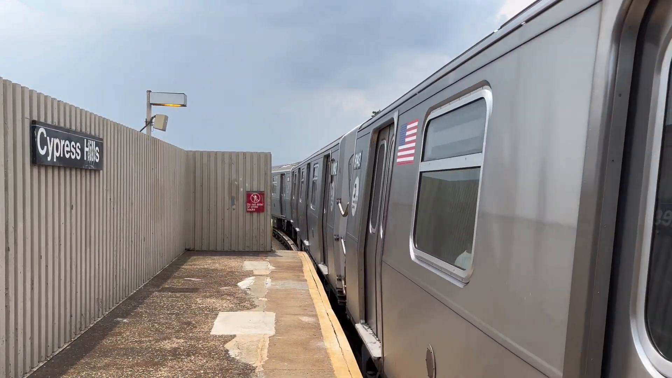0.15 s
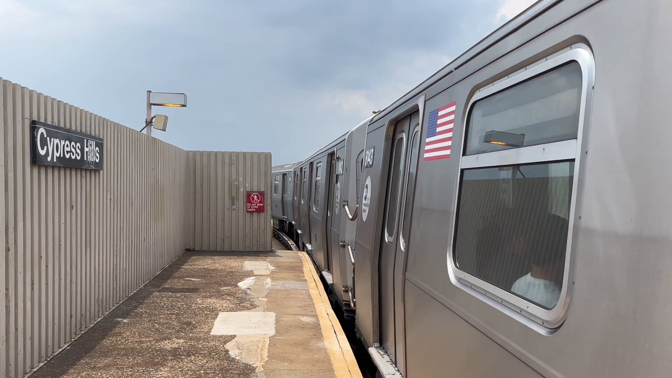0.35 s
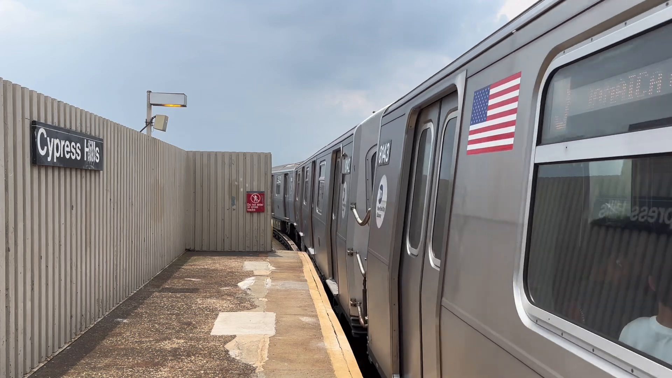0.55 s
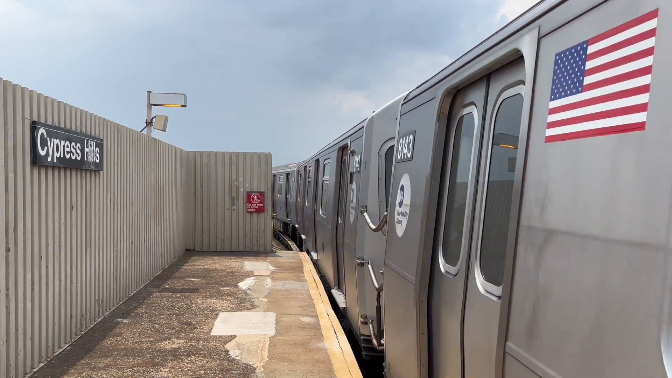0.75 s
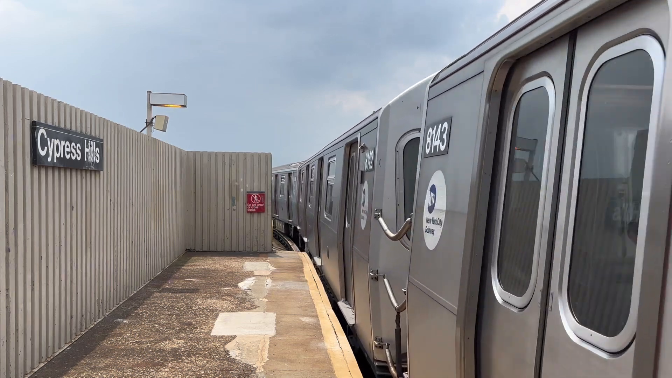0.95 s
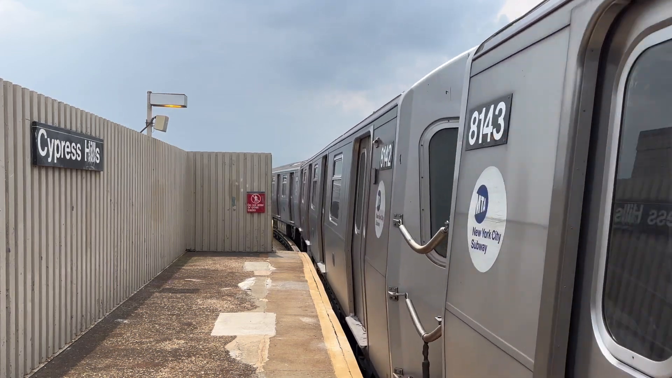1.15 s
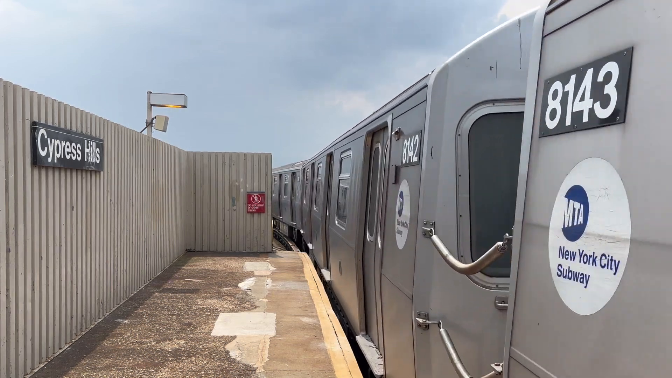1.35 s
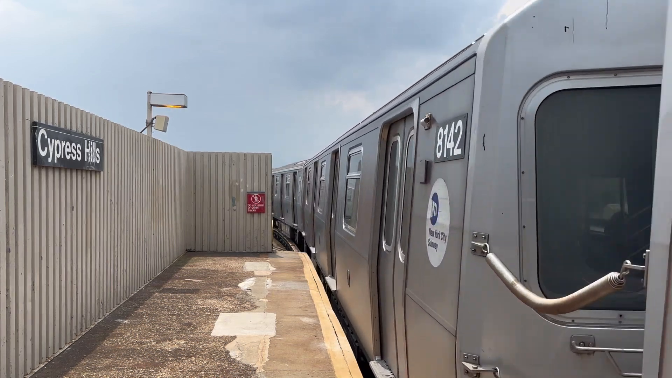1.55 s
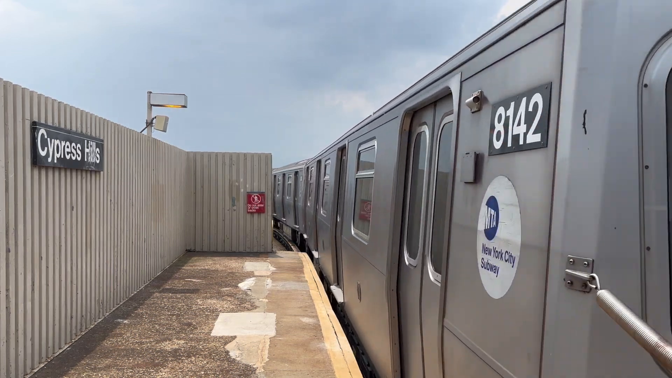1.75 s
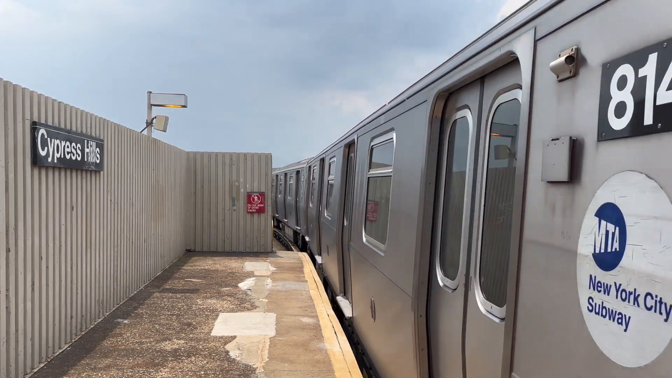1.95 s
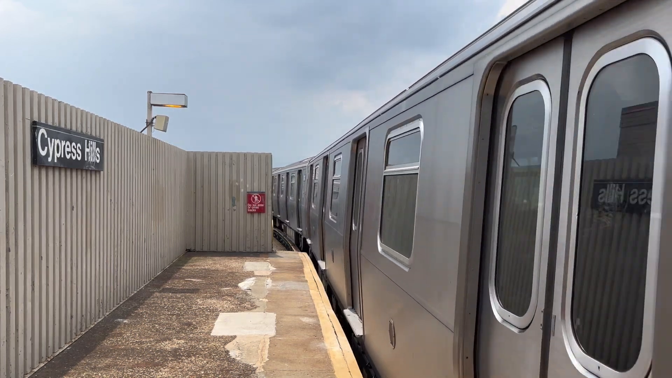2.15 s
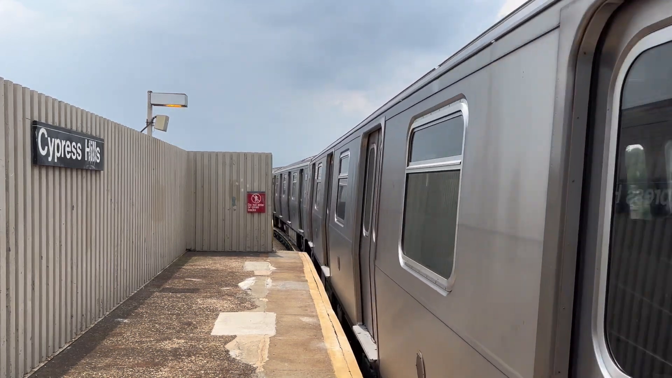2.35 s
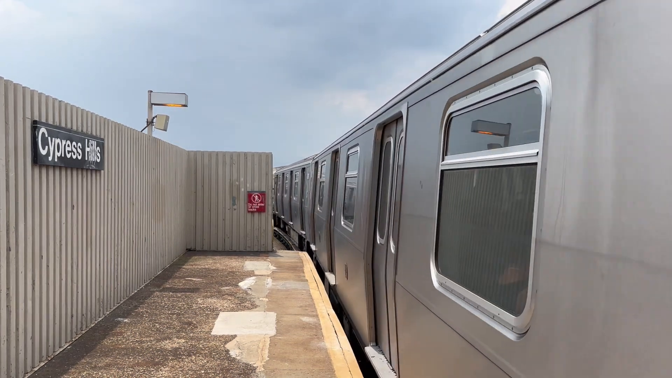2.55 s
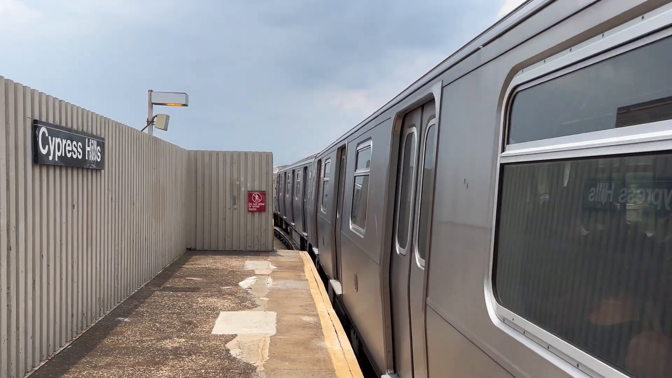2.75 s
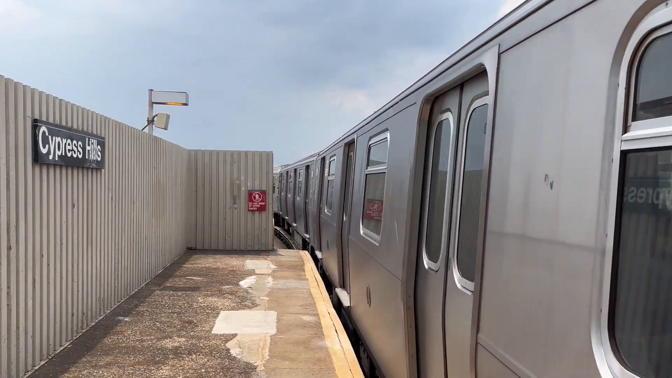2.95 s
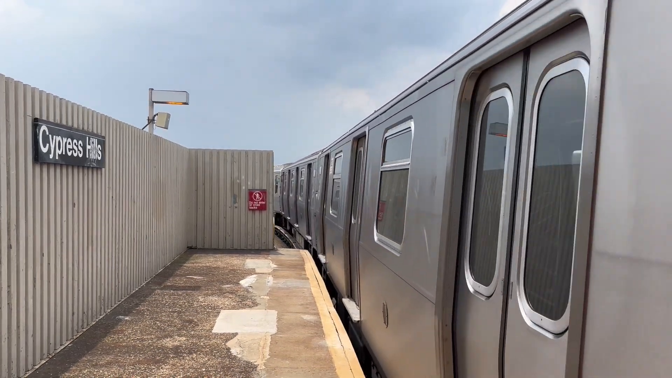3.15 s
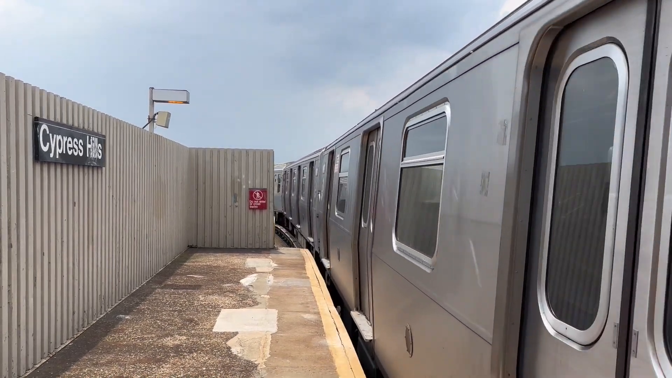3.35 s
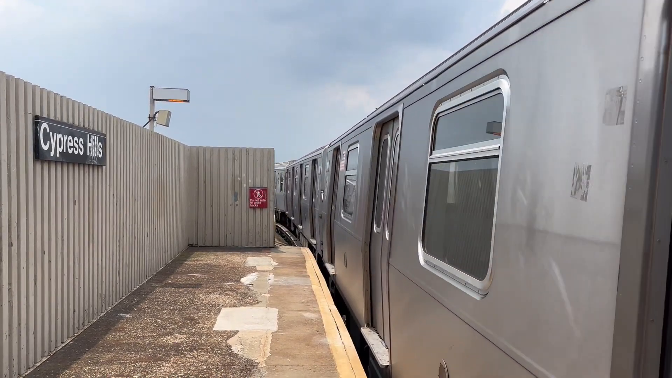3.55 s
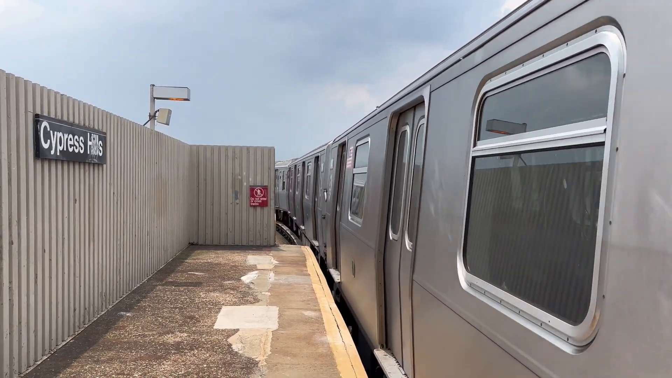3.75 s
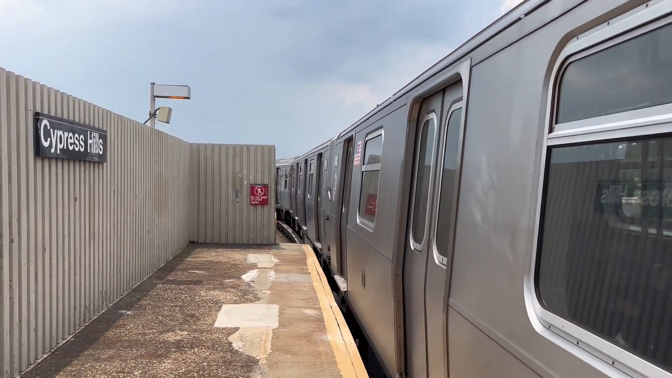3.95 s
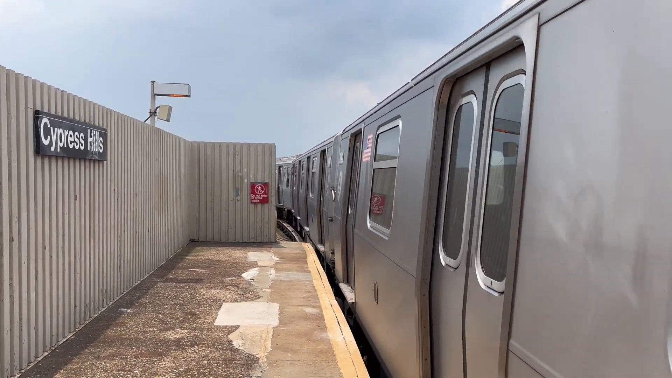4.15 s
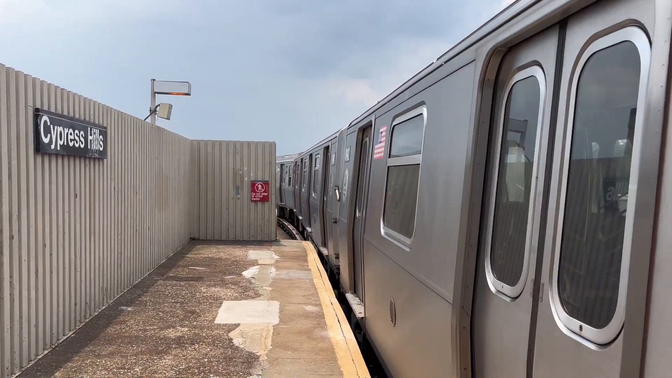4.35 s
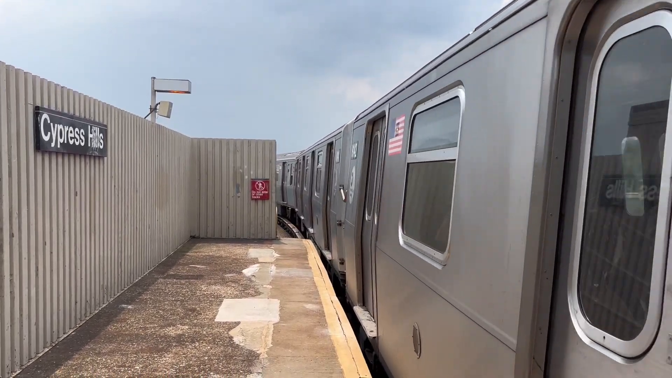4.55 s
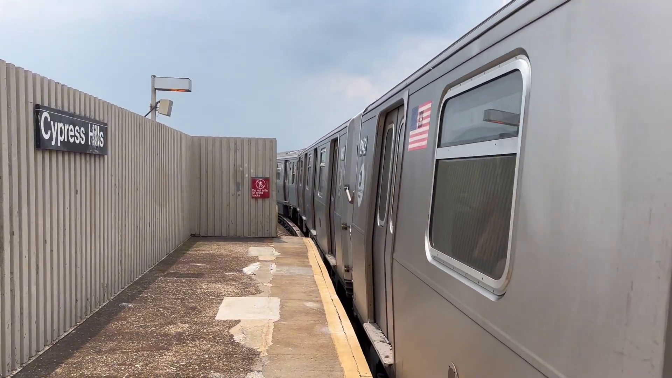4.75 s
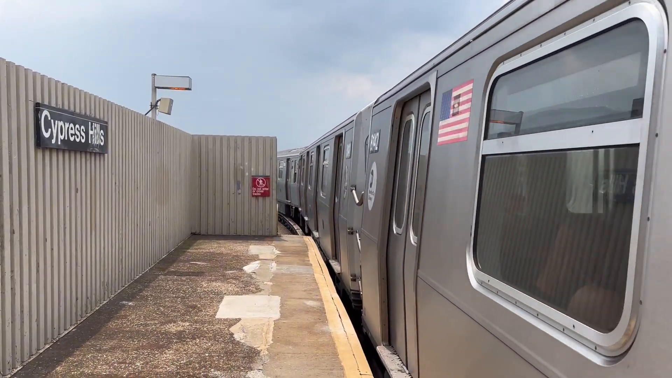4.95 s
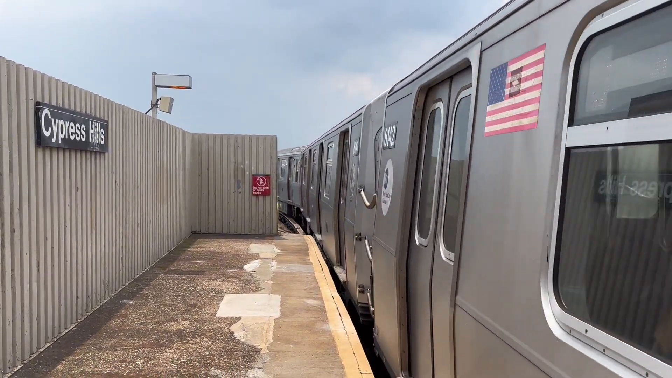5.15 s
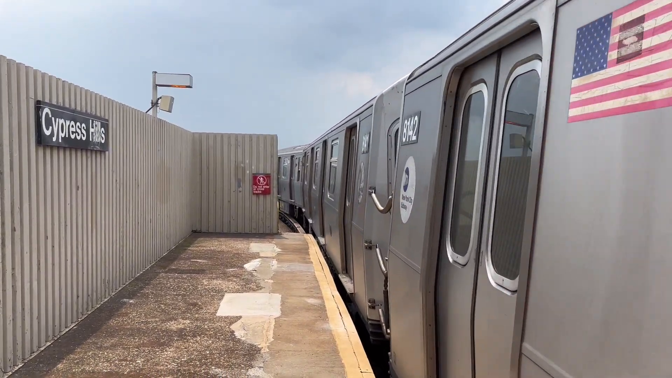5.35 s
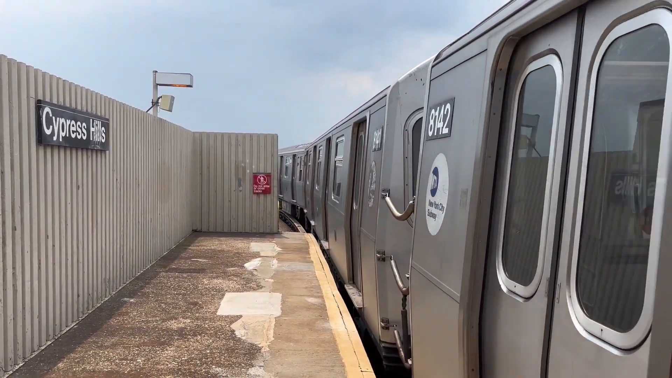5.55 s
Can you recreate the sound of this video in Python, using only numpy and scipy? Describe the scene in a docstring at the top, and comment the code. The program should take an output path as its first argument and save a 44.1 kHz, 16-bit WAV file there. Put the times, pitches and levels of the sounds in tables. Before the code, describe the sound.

Close heavy train wheels rumble and knock over rail joints, with a short opening squeal and later a thin, high, rough squealing.

```python
"""On the platform of an elevated steel track, a metre or two from a phone, a steel train rolls slowly round a curve.
Girders, track and wheels rumble, drone and grind as bands of shaped noise that follow the rolling.
Wheels knock over rail joints: bursts in the same bands, plus decaying sine modes of the struck steel.
Slipping wheels squeal and squeak as wavering tones or rough bands, with a broad rough hiss around two squeals."""
import sys
import numpy as np
from scipy import signal
from scipy.fft import rfft, irfft, next_fast_len
from scipy.io import wavfile
from scipy.ndimage import uniform_filter1d

SR = 44100
rng = np.random.default_rng(int(sys.argv[2]) if len(sys.argv) > 2 else 0)


def voltage_ratio(decibels):
    """Convert decibels (scalar or array-like) to amplitude ratios, 20 dB per decade."""
    exponent = np.asarray(decibels, float) / 20
    return 10 ** exponent


def unload_wav(signal):
    """Save mono or channel-first audio to the path in sys.argv[1] as 16-bit WAV at rate SR, clipped to [-1, 1]."""
    wavfile.write(
        sys.argv[1],
        SR,
        np.round(np.clip(np.atleast_2d(signal).T, -1, 1) * 32767).astype(np.int16),
    )


N = 247401
M = next_fast_len(N)  # spectrum length in samples
F = np.maximum(np.arange(M // 2 + 1) * SR / M, 1)  # Hz
T = np.arange(N) / SR  # seconds

# Steady rolling. Each row: time in seconds, girder boom in dB, track drone in dB, wheel grind in dB.
ROLL = [(0.0, -18.5, -23.5, -34.5), (0.28, -22.5, -25.5, -30), (0.45, -21, -20, -33),
        (1.12, -26, -22.5, -37), (1.45, -20, -23.5, -29), (1.67, -23, -20, -37.5), (1.94, -21, -24, -32.5),
        (2.25, -24, -18.5, -35), (2.53, -21.5, -24.5, -37.5), (2.83, -33, -25, -39.5),
        (3.23, -28, -21, -34), (3.47, -20.5, -24.5, -38.5), (4.05, -25.5, -27, -38.5),
        (4.34, -24.5, -22, -37.5), (4.73, -24, -28, -40), (4.86, -18, -21, -37), (5.0, -25.5, -22, -36.5),
        (5.61, -19.5, -26, -37.5)]
# Bands of boom, drone, grind and hiss. Each row: low edge in Hz, high edge in Hz.
ROLL_BANDS = [(30, 100), (120, 500), (800, 3500), (11000, 14000)]
# Colour of rolling. Each row: frequency in Hz, relative density in dB per Hz.
ROLL_COLOUR = [(22, -3), (35, -14), (52, 3), (90, 4), (125, -9), (210, -10), (500, -20.5), (800, -27),
               (1900, -36), (2600, -39.5), (5000, -47.5), (8500, -46.5), (12000, -51), (15500, -53.5)]
# Peaks and dips in the colour of rolling. Each row: frequency in Hz, width in Hz, gain in dB.
COLOUR_PEAKS = [(52.7, 12, 11.5), (135.7, 33, 7), (217.4, 39, 4), (368, 22, 0), (464, 20, 4.5),
                (1290, 76, 1), (1680, 17, -9), (2035, 36, 3), (2540, 48, -6), (3010, 140, 4),
                (4300, 1700, 5.5), (6550, 49, 5), (8450, 290, 0)]
# Wheels over joints; far joints arrive smeared.
# Each row: time in seconds, clack in dB, thud over clack in dB, tick over clack in dB, softness in ms.
KNOCKS = [(.204, -17, 5, -19.5, 1.9), (.289, -20.5, 0, -22, 16), (.682, -12, -4.5, -23, 4.8),
          (.728, -36.5, 20, -20, 5.5), (.902, -23.5, 2.5, -29.5, 4.2), (1.097, -27, 9, -21, 6.3),
          (1.332, -18, 3, -20, 1.5), (1.407, -24.5, 12.5, -21.5, 6), (1.698, -19.5, -3, -16, 0.74),
          (1.822, -13.5, -2.5, -24.5, 1.6), (1.903, -19.5, 6.5, -30, 3.7), (1.963, -20, -7, -40, 7.1),
          (2.475, -20.5, -1, -23, 8.1), (2.574, -24, 8.5, -18, 2), (2.717, -37, 13.5, -34, 4.6),
          (2.991, -18.5, 2.5, -26, 64), (3.088, -22, 3, -35, 1.6), (3.167, -26.5, 5, -22, 6.1),
          (3.493, -28, 4, -12.5, 20), (3.563, -19, -3, -31.5, 42), (3.659, -15.5, -5, -23, 75),
          (4.224, -28.5, 11.5, -34, 6.4), (4.285, -25, -4, -26, 8.4), (4.689, -18.5, 6, -18, 4.8),
          (4.807, -23.5, -1, -40, 5.1), (5.23, -14, -6, -25, 1.4), (5.27, -38.5, 19.5, -8, 7.5)]
# Where the parts of a knock sit: thud, body, clack and tick in Hz.
KNOCK_PART_HZ = [180, 500, 1800, 7000]
# How a knock rings out; lows stay longest.
# Each row: frequency in Hz, 60 dB decay in seconds, rise in seconds, colour in dB.
KNOCK_RING = [(40, 0.98, 0.015, -15), (81, 0.52, 0.034, -8.5), (162, 0.51, 0.0027, -5),
              (403, 0.57, 0.0083, -5.5), (960, 0.56, 0.011, -14.5), (1490, 0.39, 0.0092, -14),
              (2030, 0.32, 0.0038, -15.5), (2630, 0.39, 0.0051, -19.5), (3940, 0.55, 0.0018, -14),
              (9000, 0.47, 0.00068, -10), (14400, 0.45, .001, -20)]
# What wheel and rail ring with when struck.
# Each row: frequency in Hz, relative level in dB, 60 dB decay in seconds.
BLOW_MODES = [(330, -7, .12), (420, -7, .12), (530, -7, .12), (620, -7, .12), (720, -8, .11),
              (930, -12, .1), (1120, -13, .09), (1290, -13, .09), (1420, -13, .09), (1560, -14, .08),
              (1760, -15, .08), (1960, -16, .08), (2200, -18, .07)]
# How hard each squeal sounds, one list a squeal. Each row: time in seconds, level in dB.
SQUEALS = [
    [(.015, -45), (.03, -33.5), (.126, -33), (.198, -30), (.25, -59), (.316, -27), (.346, -27), (.38, -38),
     (.46, -39), (.61, -57)],
    [(1.25, -51), (1.43, -51), (1.78, -43), (2.12, -39.5), (2.38, -48.5), (2.45, -39.5), (3.0, -41.5),
     (3.2, -42.5), (3.55, -41.5), (3.72, -46), (3.8, -53), (4.1, -71)],
    [(3.1, -93), (3.85, -59), (3.95, -55), (4.4, -49), (4.76, -50), (4.9, -63), (5.2, -65), (5.26, -52),
     (5.38, -62), (5.61, -55)],
    [(0, -56), (.28, -58), (.5, -72), (1.39, -61), (2.16, -66), (3.5, -73), (3.7, -64), (4.22, -75),
     (5.03, -61), (5.61, -59)],
]
# Narrow modes of the long squeals, and a broad rough hiss around two of them, one list a squeal.
# Each row: frequency in Hz, width in Hz, level within the squeal in dB.
SQUEAL_PARTS = [
    [(1011, 4, 0)],
    [(4921, 14, -5), (4838, 60, -6), (4885, 130, -5), (4950, 600, -11)],
    [(6586, 12, -3), (6510, 90, -6), (6440, 30, -6), (6550, 400, -12)],
    [(6045, 16, 0)],
]
# Short squeaks. Each row: start in seconds, length in seconds, frequency in Hz, width in Hz, level in dB.
SQUEAKS = [(0, 0.46, 2540, 100, -44), (0, 0.92, 2030, 110, -47.5), (.24, 0.2, 8310, 70, -52),
           (0.693, 0.047, 8550, 80, -46.5), (0.893, 0.12, 4300, 1100, -45), (1.042, 0.054, 6800, 120, -48),
           (1.08, 0.7, 2000, 150, -44.5), (1.291, 0.066, 1290, 10.8, -29), (1.34, 0.069, 3000, 110, -60),
           (1.694, 0.037, 8520, 200, -42), (1.696, 0.018, 13400, 500, -43), (1.839, 0.033, 8450, 80, -47),
           (1.893, 0.083, 6580, 90.3, -45), (2.04, .1, 2980, 110, -60), (2.459, 0.1, 1106, 160, -35),
           (3.599, 0.045, 4000, 590, -43), (4.525, 0.034, 8700, 300, -59), (4.97, 0.025, 8300, 150, -50),
           (5.057, 0.27, 2020, 230, -45.5), (5.231, 0.063, 7120, 290, -41.5),
           (5.266, 0.053, 10600, 450, -55.5)]
# Two microphone ports.
# Each row: frequency in Hz, likeness from 0 to 1, left minus right in dB, left's lead in radians.
PORTS = [(60, .999, -1, 0), (130, .94, .5, 0), (290, .84, -.5, 0), (640, .3, .5, 0), (1000, .4, 1.5, 0),
         (1700, .6, 2, -1), (3200, .65, 3, .7), (4300, .75, 4, .6), (5000, .8, 4, .4), (5700, .8, 1.5, -.4),
         (6500, .95, .5, 0), (8000, .92, .3, -.2), (8900, .93, 0, -2.0), (9500, .97, 0, -3.0),
         (10700, .97, 0, -3.3), (12000, .9, 0, -6.0), (13700, .9, 0, -6.5), (14900, .98, 0, -9.2),
         (15600, .98, 0, -9.5)]
SIDE = np.array([[.5], [-.5]])  # left and right shares of a port difference

HISS_DB, HISS_SHARE = -61, 0.66  # flange hiss: mean level, and the share of the grind's swings that it follows
BOOM_SURGE_DB, BOOM_SURGES_PER_S = 3, 9  # the girders swell and slacken at random; dB per unit of walk()
BODY_DB, BODY_SHARE = -4.5, 0.49  # body of a knock over its clack, and the share of the thud added to it
LEAD_S = .004  # a knock starts this long before its listed time
BLOW_DB = 1.5  # trim of the ringing steel
LOCK_HZ = 45  # slips lock on to modes no wider than this
# the grip comes and goes, in dB per unit of walk(); lower squeals are steadier
FLUTTER_DB, FLUTTERS_PER_S, FLUTTER_FULL_HZ = 1.5, 16, 4000


def track(rattle_db=1.5, flicker_db=1.0):
    """Steel track shaken by rolling and by knocks: third-octave noise bands whose power adds both."""
    peaks_db = sum(db * mode(hz, width) for hz, width, db in COLOUR_PEAKS)
    colour = voltage_ratio(over_hz(F, ROLL_COLOUR)[0] + peaks_db + fine_modes())
    times, *levels = np.transpose(ROLL)
    grind = levels[-1]
    levels.append(HISS_DB + HISS_SHARE * (grind - grind.mean()))
    surge = BOOM_SURGE_DB * walk(BOOM_SURGES_PER_S)
    # each level sets its own band; between bands the gain blends
    share = [np.sum(colour[(F > lo) & (F < hi)] ** 2) for lo, hi in ROLL_BANDS]
    gains = np.array(levels) - 10 * np.log10(share)[:, None]
    centres = np.log(np.prod(ROLL_BANDS, axis=1)) / 2
    noise, rattle, out = port_noise() * colour, walk(40), 0
    for hz in 20 * 2 ** (np.arange(30) / 3):
        mask = np.cos(np.pi / 2 * np.clip(3 * np.log2(F / hz), -1, 1)) ** 2
        blended = [np.interp(np.log(hz), centres, g) for g in gains.T]
        # slow, heavy parts follow a change of load lazily
        gain_db = uniform_filter1d(np.interp(T, times, blended), int(5 * SR / hz))
        surge_db = surge * np.clip(2 - hz / 70, 0, 1)
        rolling_power = voltage_ratio(2 * (gain_db + surge_db)) * np.sum((colour * mask) ** 2)
        # loose parts shake the bands together, upper ones most; each band also flickers alone
        shake = voltage_ratio(min(hz / 900, 1) * rattle_db * rattle + flicker_db * walk(11))
        band = irfft(noise * mask, M)[:, :N]
        # the deepest bands are partly evened out, so the rumble throbs less than plain noise
        swing = uniform_filter1d(band.mean(axis=0) ** 2, int(2 * SR / hz)) + 1e-18
        band = band * swing ** (-.3 * np.clip(1 - hz / 140, 0, 1))
        out = out + band / band.std() * np.sqrt(rolling_power + knock_power(hz)) * shake
    return out


def fine_modes(count=120, top_db=1.5, q=70.):
    """Gain in dB from the crowd of narrow wheel, rail and car-body modes that rolling keeps ringing."""
    place, size = rng.random((count, 2)).T
    hz = 300 * 30 ** ((np.arange(count) + place) / count)  # spread over 300 to 9000 Hz
    return sum(top_db * a * mode(f, f / q) for f, a in zip(hz, size))


def knock_power(hz):
    """Power that joint knocks put into the band at hz: a front, a short clatter that holds, then a ring-out."""
    t60, rise, colour_db = over_hz(hz, KNOCK_RING)
    power, age = np.zeros(N + SR), np.arange(SR // 2) / SR
    hold = 0.023 * min(2500 / hz, 1)  # seconds
    ring_out = voltage_ratio(-120 * np.maximum(age - hold, 0) / t60)
    for s, clack_db, thud_db, tick_db, soft_ms in KNOCKS:
        parts_db = [thud_db, BODY_DB + BODY_SHARE * thud_db, 0, tick_db]
        db = clack_db + colour_db + np.interp(np.log(hz), np.log(KNOCK_PART_HZ), parts_db)
        # the harder the knock, the stronger its front
        front = 6.1 / soft_ms * np.exp(-age / 0.0062) * min(hz / 1200, 1)
        onset = (1 - np.exp(-age / (rise + soft_ms / 2000))) ** 2
        start = int((s - LEAD_S) * SR)
        power[start:start + len(age)] += voltage_ratio(2 * db) * onset * (ring_out + front)
    return power[:N]


def blows(scatter_db=3.0, detune=.04):
    """Blows ring the steel as decaying sines, each at a new spot, so new strengths and pitch; soft ones hardly do."""
    hz, mode_db, t60 = np.transpose(BLOW_MODES)[:, :, None]
    _, pan_db, lead = over_hz(hz, PORTS)
    out, age = np.zeros((2, N + SR)), np.arange(SR // 4) / SR
    attack = np.minimum(age / 0.0029, 1)
    chance = rng.standard_normal((len(KNOCKS), 4, len(hz), 1))
    for (s, clack_db, *_, soft_ms), (size, pitch, *phase) in zip(KNOCKS, chance):
        ring_db = clack_db + BLOW_DB + mode_db + scatter_db * size - 60 * age / t60
        ring = voltage_ratio(ring_db) * min(2.05 / soft_ms, 1)
        cycle = 2 * np.pi * hz * (1 + detune * pitch) * age
        start = int((s - LEAD_S) * SR)
        for port, side in enumerate((.5, -.5)):
            tones = voltage_ratio(side * pan_db) * ring * np.sin(cycle + side * lead + 0.46 * phase[port])
            out[port, start:start + len(age)] += tones.sum(axis=0) * attack
    return out[:, :N]


def squeals():
    """Stick-slip at the flange keeps a few wheel modes singing unsteadily, two with a broad rough hiss around them."""
    out = 0
    for curve, parts in zip(SQUEALS, SQUEAL_PARTS):
        s, db = np.transpose(curve)
        song = sum(voltage_ratio(g) * slip(hz, width) for hz, width, g in parts)
        level = np.interp(T, s, voltage_ratio(db), left=0, right=0)
        depth_db = FLUTTER_DB * min(parts[0][0] / FLUTTER_FULL_HZ, 1)
        out = out + song * level * voltage_ratio(depth_db * walk(FLUTTERS_PER_S))
    return out


def squeaks():
    """Brief slips, each a tone or a rough band, quick to start and fading until 1.3 lengths."""
    out = 0
    for s, length, hz, width, db in SQUEAKS:
        age = (T - s) / length
        shape = np.clip(age / 0.083, 0, 1) * np.clip((1.3 - age) / 0.57, 0, 1)
        out = out + voltage_ratio(db) * shape * slip(hz, width)
    return out


def slip(hz, width, waver_db=2.5):
    """Stick-slip around hz, near rms 1: a wavering tone if the slips lock on to a mode, else a rough band."""
    if width > LOCK_HZ:
        return sound(port_noise(0.23) * mode(hz, width))
    _, pan_db, lead = over_hz(hz, PORTS)
    cycle = 2 * np.pi * np.cumsum(hz + width * walk(45)) / SR
    return np.sqrt(2) * voltage_ratio(SIDE * pan_db + waver_db * walk(35)) * np.sin(cycle + SIDE * lead)


def mode(hz, width):
    """Gain of a steep resonance: 1 at its centre, half at width / 2 to either side."""
    return 1 / (1 + (2 * (F - hz) / width) ** 2)


def port_noise(more_alike=0.):
    """Spectrum of white noise at both ports: a shared wave with its lag, plus a scattered part each."""
    alike, pan_db, lead = over_hz(F, PORTS)
    alike = np.clip(alike + more_alike * (1 - alike), 0, 1)
    shared, *own = rfft(rng.standard_normal((3, M)))
    together = np.sqrt(alike) * shared * np.exp(1j * SIDE * lead)
    scattered = np.sqrt(1 - alike) * np.array(own)
    return voltage_ratio(SIDE * pan_db) * (together + scattered)


def sound(spectrum):
    """Back to time, with the mean of both ports at rms 1."""
    x = irfft(spectrum, M)[:, :N]
    return x / np.sqrt(np.mean(x.mean(axis=0) ** 2))


def walk(rate):
    """Random levels held 1 / rate s and slewed twice; spread near 0.7."""
    k = int(SR / rate)
    held = np.repeat(rng.standard_normal(N // k + 1), k)
    return 0.983 * uniform_filter1d(uniform_filter1d(held, k), k)[:N]


def over_hz(hz, table):
    """Columns of a table that starts with Hz, read on a log-frequency axis."""
    at, *columns = np.transpose(table)
    return [np.interp(np.log(hz), np.log(at), c) for c in columns]


def scene():
    """Track, blows, squeals and squeaks summed as they reach the two ports."""
    return track() + blows() + squeals() + squeaks()


def top_cut(x):
    """Nothing passes above the cut-off."""
    return signal.sosfilt(signal.butter(12, 15710, fs=SR, output="sos"), x)


def record(dry):
    """The phone cuts the deepest bass and rounds the loudest peaks."""
    bass_cut = signal.butter(4, 34, "high", fs=SR, output="sos")
    cut = signal.sosfilt(bass_cut, dry)
    mix = np.tanh(0.7 * cut) / 0.72
    return top_cut(mix)


dry = scene()
out = record(dry)
unload_wav(out)
```